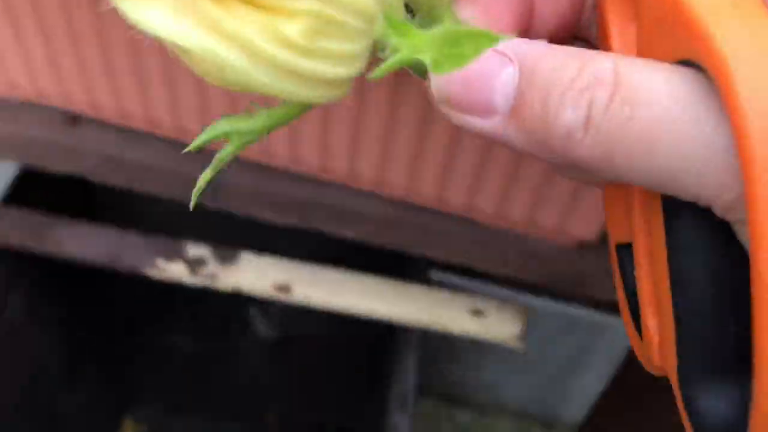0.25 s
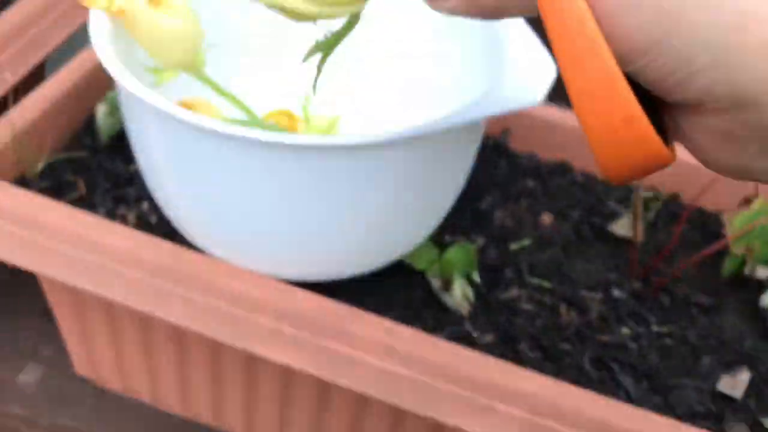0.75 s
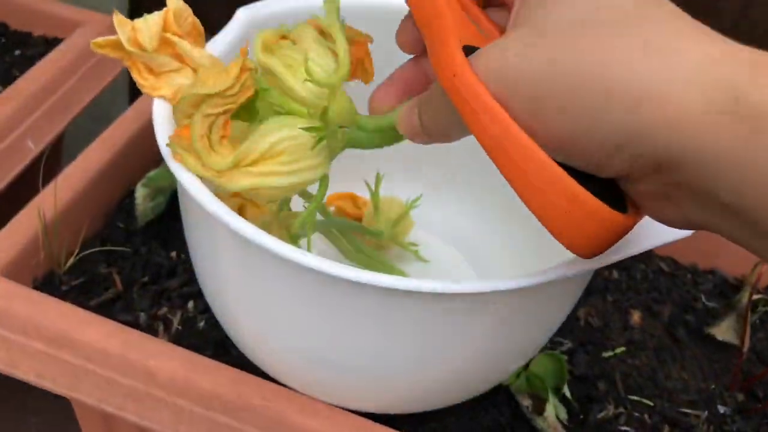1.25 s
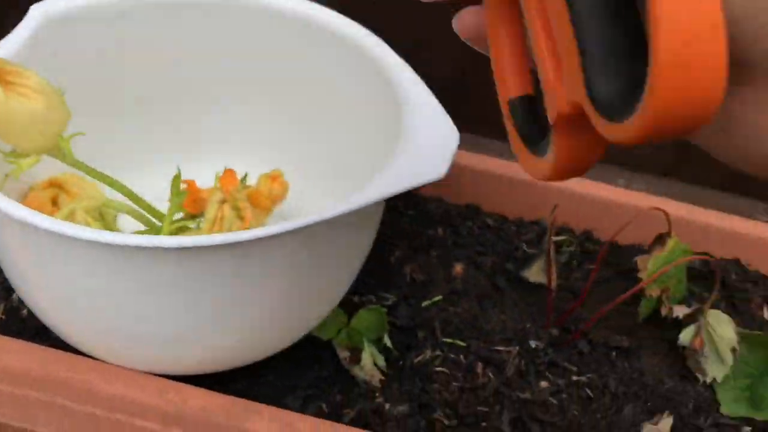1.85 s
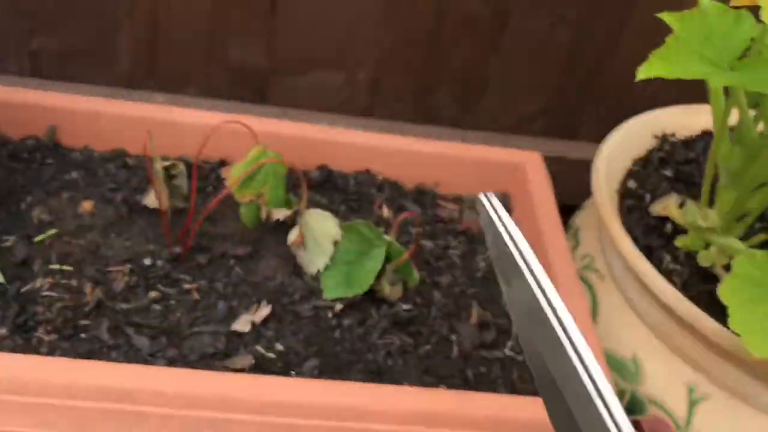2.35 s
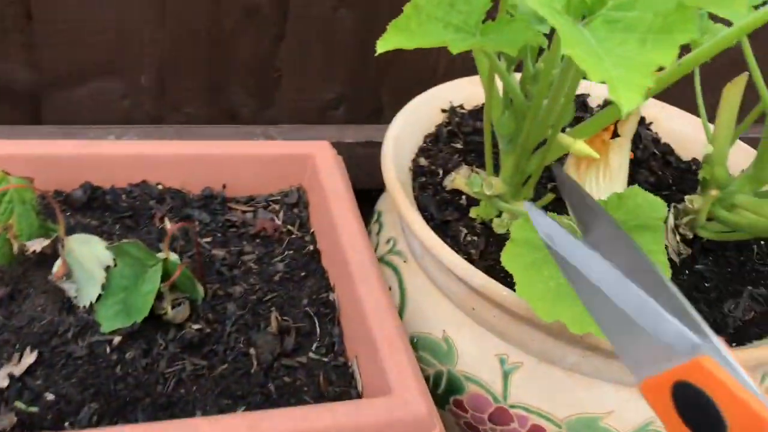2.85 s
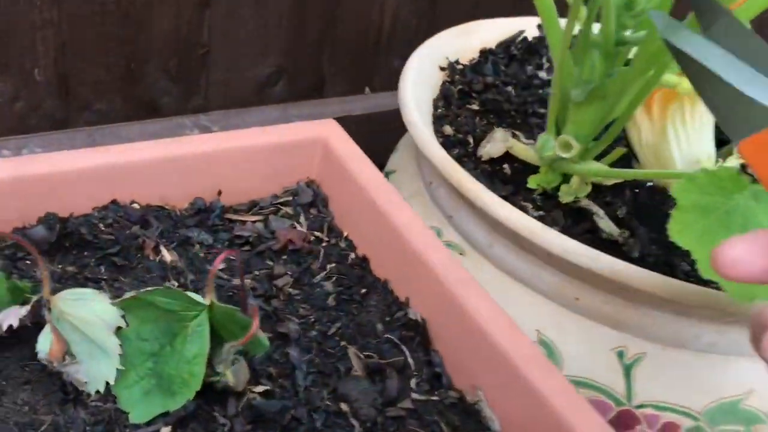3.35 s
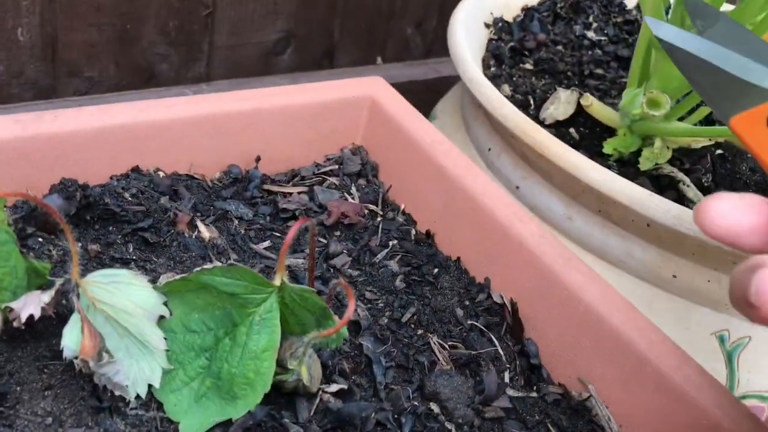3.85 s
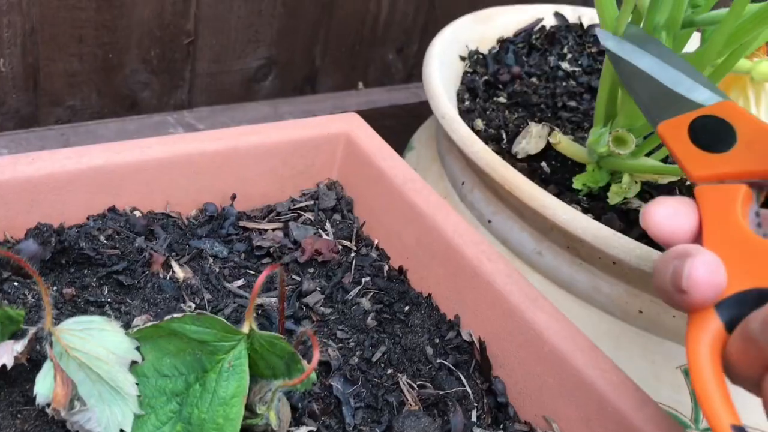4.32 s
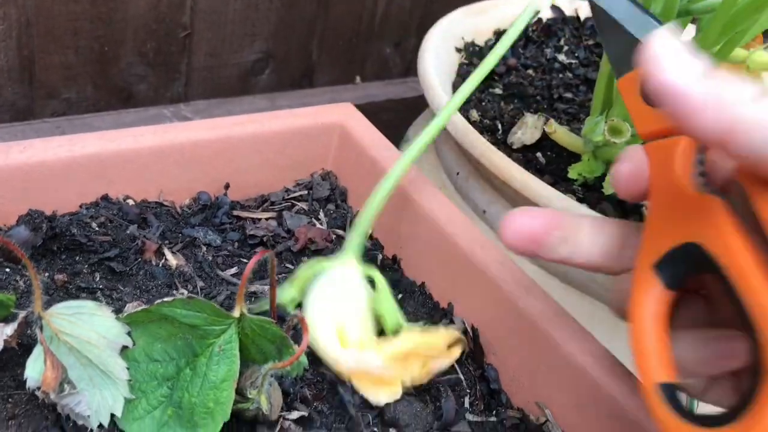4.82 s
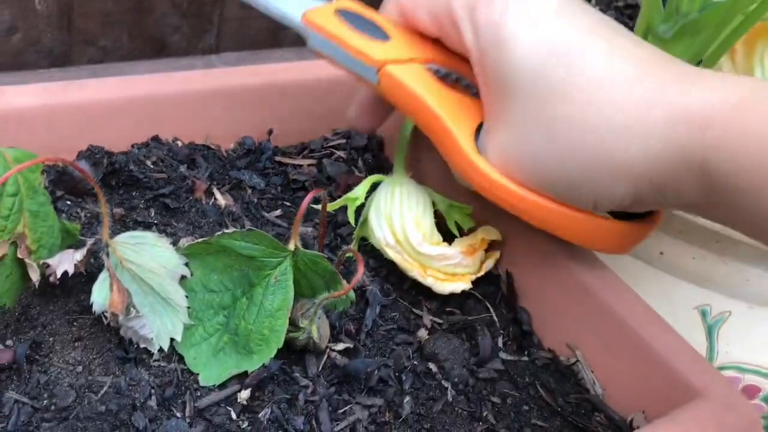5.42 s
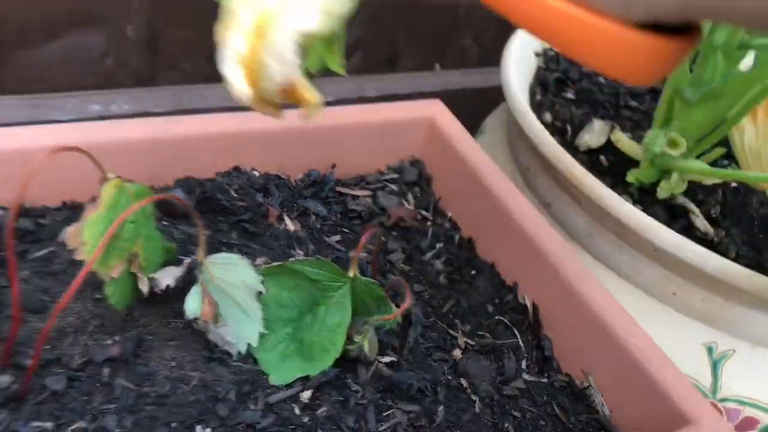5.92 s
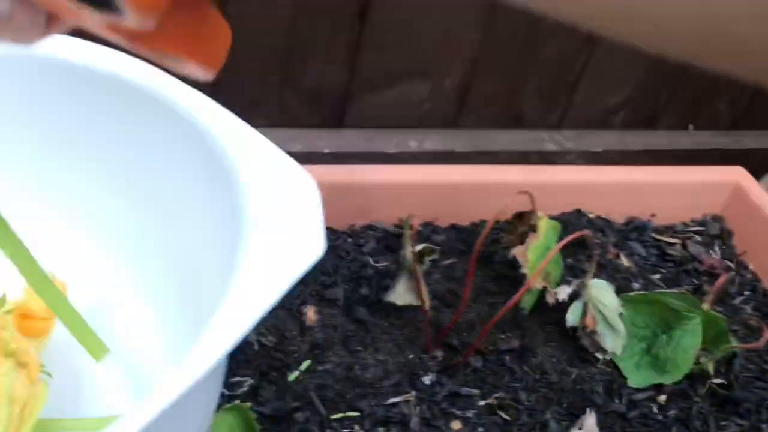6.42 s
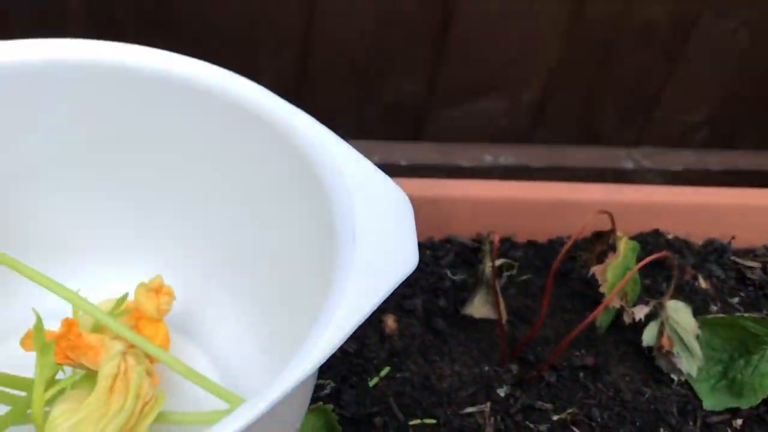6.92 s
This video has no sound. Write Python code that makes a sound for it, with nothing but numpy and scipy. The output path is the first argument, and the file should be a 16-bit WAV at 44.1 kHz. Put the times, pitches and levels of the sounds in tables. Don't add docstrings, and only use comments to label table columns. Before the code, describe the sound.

A quiet outdoor spot with soft engines droning beyond a fence. Early on, stalks bump a plastic bowl, giving a dull low knock and a flurry of ticks. Blades slide with thin metallic whispers, a pause, then fibres crunch and the scissors clack shut, by far the loudest event, with a short ring. Afterwards come leaf rustles, a small pot tap and a final gentle bowl knock, heard close on a phone.

```python
import sys
import numpy as np
from scipy import signal
from scipy.fft import rfft, irfft
from scipy.io import wavfile
from scipy.ndimage import uniform_filter1d

SR = 44100
rng = np.random.default_rng(int(sys.argv[2]) if len(sys.argv) > 2 else 0)


def waveform_to_disk(signal):
    frames = np.transpose(np.atleast_2d(signal))
    scaled = np.clip(frames, -1, 1) * 32767
    samples = np.round(scaled).astype(np.int16)
    wavfile.write(sys.argv[1], SR, samples)


def gain_from_db(level_db):
    decades = np.asarray(level_db, float) / 20
    return 10 ** decades


N = 316281
LN_1000 = np.log(1000)

# pitch_hz, density_db
AIR = [(15, -35.5), (25, -9.5), (55, 3), (130, -4.5), (206, -7.5), (405, -17.5), (695, -36), (962, -23),
       (2550, -35), (4030, -34.5), (4740, -40), (8140, -39), (10400, -42.5), (14800, -42), (16000, -49)]
# time_s, pitch_hz, level_db
FAR_TONES = [
    [(4.16, 397, -70), (4.36, 402, -73), (4.45, 408, -80), (4.63, 421, -68), (4.72, 425, -71),
     (4.8, 434, -67), (4.94, 435, -71), (5.0, 443, -65), (5.12, 452, -78)],
    [(5.15, 570, -82), (5.3, 577, -79), (5.4, 582, -81), (5.46, 586, -86), (5.57, 605, -81)],
    [(5.43, 2500, -81), (5.47, 2660, -82), (5.51, 2720, -82), (5.55, 2760, -90), (5.63, 2780, -80),
     (5.68, 2760, -88), (5.75, 2700, -92), (5.79, 2650, -82), (5.81, 2640, -88)],
]
# peak_s, level_db, rise_s, fall_s
SURGES = [(0.1, -39, .6, 0.6), (0.52, -43.5, 0.66, 0.15), (1.0, -51.5, 0.43, 0.29), (1.38, -43, 0.13, 0.34),
          (1.9, -50.5, 0.31, 0.47), (2.55, -49, 0.36, 0.28), (3.0, -44.5, 0.304, 0.194),
          (3.39, -45.5, 0.36, 0.37), (3.77, -49, 0.28, .3), (4.25, -54.5, 0.3, 0.51),
          (4.68, -56, 0.14, 0.49), (6.03, -57, 0.332, 0.1), (6.8, -54.5, 0.56, 0.2)]
# peak_s, level_db, rise_s, fall_s
DRONES = [(0.62, -48.5, 0.23, 0.197), (1.1, -51, 0.33, 0.56), (1.75, -54, 0.64, 0.563),
          (2.4, -54.5, 0.295, 0.426), (2.85, -53, 0.137, 0.15), (3.55, -51, 0.7, 0.748),
          (4.3, -55, 0.23, 0.34), (4.8, -49, 0.49, 0.54), (5.4, -43.5, 0.58, 0.562), (5.95, -48, 0.424, 1),
          (6.35, -41.5, 0.103, 0.768), (7.09, -43, 0.474, 0.272)]
# nearest_s, level_db, and coming_s, going_s to cover one kerb distance
CARS = [
    (1.4, -67.5, 0.3, .2),
    (2.65, -52, 0.85, 0.49),
    (5.3, -63.5, 0.87, 0.56),
]
# multiple, level_db
CLOCK = [(1, -90), (4, -88), (6, -89), (8, -92), (13, -96), (15, -98)]
# low_hz, high_hz
SHARES = [(1000, 3000), (2600, 10000), (8200, 15500)]

# start_s, blow_db, contact_ms
KNOCKS = [(1.1105, -34, 0.41), (1.1118, -22.5, 0.98), (1.1135, -26.5, 1.5), (1.132, -31, 0.95),
          (1.146, -35, 1.12), (1.158, -36.5, 0.77), (1.178, -32.5, .9), (1.1825, -34, 1.03),
          (1.19, -40.5, 1.1), (1.321, -44, 0.85), (1.352, -43, 1.1), (1.358, -43, 0.9), (1.387, -45, 1.1),
          (1.405, -38.5, 0.73), (1.413, -43, 0.86), (1.426, -47, 0.53), (1.44, -52, 0.69),
          (1.497, -44, 0.51), (6.705, -50, 0.54)]
# pitch_hz, level_db, t60_s
BOWL_MODES = [(524.4, -16, 0.098), (549, -9, 0.1), (568, -9, 0.098), (610, -25, 0.044), (698, -33, 0.031)]
# start_s, blow_db; pitch_hz, level_db, t60_s
BUMPS = [
    ([(1.1102, -38.5)], [(1710, 0.5, 0.0143), (2100, -2.5, 0.0313), (2520, 0, 0.0184), (3140, 2, 0.015), (5330, -16, 0.016)]),
    ([(4.9113, -37.5), (4.9165, -56)], [(1213, -4, 0.014), (1620, -2, 0.015), (1982, 3.5, 0.016), (2603, -9.5, 0.06), (2940, -11, 0.055)]),
    ([(2.8045, -56), (2.8123, -52), (4.8305, -49.5), (4.834, -64), (4.845, -64.5), (4.912, -49)], [(610, 4, 0.022), (890, 8, 0.012), (1290, 7.5, 0.0107), (1980, -17.5, 0.0145)]),
    ([(6.5685, -28.5)], [(584, -2, 0.032), (671.5, -7, 0.055), (990, -1.5, 0.0244), (1320, -2, 0.015), (1943, -21, 0.024), (2880, -37.5, 0.023)]),
]
# peak_s, level_db, rise_s, fall_s
DRAGS = [
    (1.145, -52, .02, 0.031),
    (1.17, -57.5, 0.029, 0.0136),
    (1.345, -57.5, 0.036, 0.05),
    (1.41, -54, 0.05, 0.03),
]

# peak_s, level_db, rise_s, fall_s, dullness_db
PETALS = [(1.125, -72, 0.0102, 0.029, 11.5), (1.18, -74.5, 0.026, 0.0196, 11),
          (1.335, -62.5, 0.046, 0.035, 2.5), (1.378, -63.5, 0.0145, 0.0193, 13.5),
          (1.41, -63, 0.043, 0.085, 1.5), (1.497, -49.5, 0.011, 0.011, -9),
          (1.53, -64.5, 0.02246, 0.048, 2), (6.553, -58, 0.0165, 0.057, -0.5),
          (6.605, -62, 0.066, 0.024, 1), (6.672, -58.5, 0.017, 0.051, -4.5), (6.692, -76, .01, .014, 6.5),
          (6.725, -60.5, 0.0364, 0.028, -1), (6.77, -73.5, .02, 0.027, -4)]
# peak_s, level_db, rise_s, fall_s, dullness_db
SLIDES = [(2.545, -57, 0.0178, 0.037, -11), (2.606, -50.5, 0.0225, 0.029, -2), (2.808, -62, .004, .006, 0),
          (2.816, -57.5, 0.006, 0.025, -3), (2.84, -64, 0.024, 0.04, 2), (2.87, -68, .03, 0.067, 5.5),
          (2.575, -59, .025, .025, 0), (2.635, -61, .015, .035, 2), (3.365, -60, .012, .015, 2),
          (2.99, -60, 0.027, 0.047, 0.5), (3.055, -63.5, 0.038, 0.06, -18.5),
          (3.348, -60, 0.018, 0.025, -5), (3.385, -60, 0.02, .025, 0), (4.235, -62, .02, 0.056, 0),
          (4.306, -54, .008, 0.02, -14), (4.333, -59.5, .02, 0.0087, -10.5), (4.36, -53, .012, 0.013, -7)]
# peak_s, level_db, rise_s, fall_s, dullness_db
LEAVES = [(2.16, -72, 0.072, 0.058, -4.5), (2.24, -68, 0.063, 0.092, -6), (3.995, -64, 0.006, 0.0196, -4.5),
          (4.6, -60.5, 0.034, 0.0303, -6), (4.655, -60, 0.057, 0.058, -10), (4.74, -58, 0.061, 0.07, -2.5),
          (4.833, -50, 0.0069, 0.0174, 6.5), (4.862, -58.5, 0.0203, 0.034, -6),
          (4.914, -62, .004, 0.0196, 13.5), (4.965, -64.5, 0.0368, 0.053, -4),
          (5.54, -68, .035, 0.031, 2.5), (5.575, -60.5, 0.0342, 0.0133, -1),
          (5.667, -68.5, 0.026, 0.097, 3), (5.89, -68, 0.071, 0.012, -12.5),
          (5.96, -71, 0.0696, 0.039, 0.5), (6.15, -69, 0.066, 0.13, -2), (6.346, -71.5, 0.053, 0.03, -5.5)]
# peak_s, level_db, rise_s, fall_s, dullness_db
SHAVES = [
    (2.819, -59, .006, .014, -1),
    (3.351, -68, .012, .014, -10),
]

# start_s, level_db, dullness_db
THUDS = [(0.5321, -71, 9), (4.8286, -45, -6), (5.5739, -62.5, 2), (6.5686, -68, 19.5), (6.6, -75.5, 4.5),
         (6.6357, -64, 5.5)]
# start_s, level_db, dullness_db
CLICKS = [(0.9518, -61.5, -12.5), (1.376, -57.5, -2), (1.4849, -59.5, 0.5), (1.494, -58, -4),
          (2.645, -61, -10), (3.9907, -57, -2), (4.2157, -59, -14), (4.2285, -52, -16.5),
          (4.3683, -53, -8.5), (4.6616, -56.5, -18), (4.7366, -55, -7), (4.9347, -59.5, -12.5),
          (5.078, -65, -6), (6.6998, -51, -15.5)]
# start_s, level_db, dullness_db
FLICKS = [(0.5795, -69, 6), (1.4357, -60, 3.5), (2.986, -60, 0), (3.0453, -60, 3), (3.3128, -57, -10),
          (4.2608, -60, -6), (4.3261, -61, -7), (4.5019, -60, 4.5), (4.5197, -64.5, -8), (4.9521, -62, 7.5),
          (6.6867, -58, 1), (6.6929, -60.5, 4.5), (6.985, -71, -9.5)]
# start_s, level_db, dullness_db
FIBRES = [(1.3678, -71, -1.5), (1.4013, -62.5, 9), (1.599, -76, 14.5), (2.8127, -61.5, 11), (3.143, -76, 6),
          (3.3186, -59.5, 2), (3.334, -56, 4.5), (3.3843, -69, -4.5), (5.1266, -75.5, 2.5),
          (6.144, -75, 11.5), (6.347, -76, 3.5)]
# start_s, peak_db, pitch_hz, t60_s
TAPS = [(1.3327, -47, 1392, 0.024), (1.3635, -42.5, 1446, 0.0216), (1.3681, -45, 1370, 0.039),
        (1.376, -47, 2660, .02), (1.38, -55, 3260, 0.014), (1.385, -48, 2100, 0.031),
        (1.392, -45.5, 1405, 0.022), (1.402, -49.5, 1400, 0.019), (1.403, -50.5, 2250, 0.0196),
        (1.428, -51.5, 2250, .012), (1.439, -49, 2320, 0.0116), (1.467, -51.5, 1400, 0.024),
        (1.4843, -47, 2900, 0.0117), (1.4859, -44, 1390, 0.0153), (1.4934, -42, 2880, 0.0215),
        (1.494, -35, 1320, 0.0164), (1.4955, -45, 2100, 0.0093), (1.4994, -39, 1448, 0.0188),
        (1.4998, -42, 2300, 0.011), (1.511, -45.5, 1393, 0.0196), (4.83, -38, 2202, .02),
        (4.8345, -46.5, 1893, 0.014), (4.842, -50.5, 2100, 0.0174), (4.852, -46, 1990, 0.019),
        (4.857, -48, 2144, 0.0225), (4.868, -52.5, 2100, 0.018), (6.556, -53, 1910, 0.024),
        (6.568, -53, 2360, 0.0128), (6.601, -55, 3460, .018), (6.6347, -52, 1880, 0.0143),
        (6.6886, -45, 1930, 0.017), (6.6881, -47.5, 1386, .02), (6.6938, -46, 1425, .025),
        (6.6992, -45, 2250, 0.0184), (6.711, -54, 1414, 0.04), (6.7473, -53, 1350, .025),
        (1.42, -47, 620, .04), (1.428, -44, 694, 0.033), (2.8068, -50, 3600, .012),
        (2.8126, -42, 1210, .014), (2.815, -49, 3200, .01), (2.827, -48, 2400, .014),
        (2.827, -48, 1000, .014), (5.574, -53, 3100, .015), (5.574, -50, 2700, .015)]
# start_s, peak_db, pitch_hz, t60_s
STEMS = [(4.6375, -49, 3300, .012), (4.646, -51, 5600, .015), (4.651, -51, 4500, .012),
         (4.654, -49, 8900, .01), (4.6605, -48, 4200, .012), (4.661, -52, 6000, .008),
         (4.6725, -51, 9500, .01), (4.672, -52, 4500, .012), (4.7367, -47, 2100, 0.019),
         (4.7367, -49, 4000, 0.015), (4.7367, -48, 8200, .01), (4.756, -52, 8900, .012),
         (4.756, -52, 14000, .008), (2.6447, -52, 7030, .012), (2.6447, -54, 9200, .01),
         (2.6447, -53, 12800, .01), (3.3343, -44, 9000, .006), (3.3345, -50, 3300, .014),
         (3.3186, -48, 9500, .006)]
# start_s, peak_db,
# pitch_hz, t60_s
POPS = [(4.2776, -33, 7200, .006), (4.2797, -27, 4400, .007), (4.2813, -30, 3400, .007),
        (4.2818, -31, 1890, .01), (4.2828, -31, 1120, .011), (4.294, -27, 4300, .009),
        (4.3428, -33, 4300, .009), (4.3468, -33, 3600, .013), (4.3613, -43, 7400, .006),
        (4.3685, -37, 8000, .004), (4.3878, -27, 1120, .012), (4.3926, -16, 2470, .02),
        (4.3922, -20, 1650, .012), (4.3923, -30, 530, .012), (4.3945, -19, 1280, .008),
        (4.3948, -23, 1000, .008), (4.3975, -23, 1500, .012), (4.3951, -15, 2600, .012),
        (5.1266, -46, 14600, .008), (3.3138, -54, 11000, .008), (3.3186, -49, 12200, .012),
        (3.334, -45, 12200, .01), (3.3342, -48, 10900, .012), (5.89, -62, 8300, .02),
        (4.4335, -42, 2900, .01)]

# middle_s,
# level_db, pitch_hz, length_s
SQUEAKS = [(2.531, -66, 6600, .012), (2.541, -56, 6600, .01), (2.553, -60, 5900, .014),
           (2.562, -61, 6400, .014), (2.552, -64, 10200, .02), (2.584, -64, 5800, .012),
           (2.607, -53, 4520, .032), (2.605, -53, 7600, .016), (2.596, -59, 8450, .016),
           (2.617, -61, 8000, .014), (2.612, -59, 12100, .022), (2.606, -62, 14200, .02),
           (3.322, -58, 12200, .008), (3.351, -58, 11200, .018), (4.25, -62, 4300, .016),
           (4.359, -55, 7200, .01), (5.875, -74, 6900, .04), (1.525, -63, 14900, .02),
           (1.525, -64, 12800, .024), (1.537, -65, 13800, .012)]
# start_s, level_db, dullness_db, length_s
BITES = [(4.2778, -41, -21, 0.0012), (4.2799, -31, -14.5, 0.0045), (4.2924, -38, -11, 0.002),
         (4.2938, -30, -11, 0.0028), (4.3389, -51.5, -5, 0.007), (4.3425, -33.5, -14, 0.0075),
         (4.3465, -40.5, -7.5, 0.0029), (4.356, -48, -10, .006), (4.379, -33, -12, 0.011),
         (4.387, -26.5, -10, 0.00328), (4.389, -33.5, -6.5, .003)]
# start_s, blow_db
SNAPS = [
    (4.392, -1),
    (4.3931, -13.5),
    (4.3952, -5),
    (4.3975, -17),
]
# pitch_hz, level_db, t60_s
BLADE_MODES = [(990, -21.5, 0.018), (1565, -13.5, 0.018), (2150, -12.5, 0.016), (2425, -2.5, 0.03),
               (3115, -1, 0.037), (3294, -6, 0.048), (3900, -0.5, 0.024), (4250, -5, .04),
               (4730, -10.5, 0.044), (5090, -1.5, 0.03), (5310, -7, .03), (5800, -6.5, .035),
               (6345, 1.5, 0.04), (6530, -12, 0.045), (8000, -4.5, .03), (7730, -2, .025),
               (8240, -3.5, 0.026), (9000, -6.5, .025), (10556, -19, 0.018), (12940, -9, .02),
               (15580, -25.5, .015)]


def band(x, lo_hz, hi_hz, order=2):
    return signal.sosfilt(signal.butter(order, [lo_hz, hi_hz], "bandpass", fs=SR, output="sos"), x)


def unit(x):
    return x / np.sqrt(np.mean(x ** 2))


def walk(rate_hz):
    k = int(SR / rate_hz)
    held = np.repeat(rng.standard_normal(N // k + 1), k)
    return 1.654 * uniform_filter1d(uniform_filter1d(held, k), k)[:N]


def swells(rows, bend=2.1):
    edge_db = 12
    power = np.zeros(N)
    for s, db, rise, fall in rows:
        first = max(int((s - 3 * rise) * SR), 0)
        last = min(int((s + 3 * fall) * SR), N)
        k = np.arange(first, last)
        late = k / SR - s
        away = np.where(late < 0, -late / rise, late / fall)
        power[k] += gain_from_db(db - edge_db * away ** bend) ** 2
    return np.sqrt(power)


def blows(rows, contact_ms=0.023):
    push = np.zeros(N)
    for s, db, *own_ms in rows:
        width = max((own_ms or [contact_ms])[0], 0.03) * SR / 1000
        k = np.arange(int(width) + 2) + int(s * SR)
        half_sine = np.sin(np.pi * np.clip((k - s * SR) / width, 0, 1))
        push[k] += gain_from_db(db) * half_sine * np.pi / 2 / width
    return push


def ring(push, modes):
    out = np.zeros(N)
    busy = np.flatnonzero(push)
    span = slice(busy[0], busy[-1] + SR // 2)
    for hz, db, t60 in modes:
        pole = np.exp(2j * np.pi * hz / SR - LN_1000 / (t60 * SR))
        side = rng.choice([-1, 1]) if hz > 800 else 1
        out[span] += gain_from_db(db) * side * signal.lfilter([1], [1, -pole], push[span]).imag
    return out


def grit(shape, grain_db):
    grain = 20
    sizes = gain_from_db(grain_db * rng.standard_normal(shape[:-1] + (shape[-1] // grain + 1,)))
    sizes = np.repeat(sizes, grain, axis=-1)[..., :shape[-1]]
    crackle = rng.standard_normal(shape) * sizes
    return [band(crackle, lo, hi) for lo, hi in SHARES]


def bursts(rows, shape, grain_db):
    t = np.arange(4096) / SR
    settle = 512
    first = int(0.003 * SR)
    shares = grit((len(rows), len(t) + settle), grain_db)
    out = np.zeros(N)
    for (s, db, low_db, high_db, length), *share in zip(rows, *shares):
        shaped = [v[settle:] * shape(t, length) for v in share]
        low, middle, high = (v / np.std(v[:first]) for v in shaped)
        k = int(s * SR)
        out[k:k + len(t)] += gain_from_db(db + 1.0) * (gain_from_db(low_db) * low + middle + gain_from_db(high_db) * high)
    return out


def clock():
    clock_hz = 996.95
    k = np.arange(1, 16)
    start = rng.random((len(k), 1))
    phase = 2 * np.pi * (clock_hz * k[:, None] * np.arange(N) / SR + start)
    return np.sqrt(2) * gain_from_db(np.interp(k, *np.transpose(CLOCK))) @ np.sin(phase)


def open_air():
    hz = np.maximum(np.fft.rfftfreq(N, 1 / SR), 1)
    air_hz, air_db = np.transpose(AIR)
    colour = gain_from_db(np.interp(np.log(hz), np.log(air_hz), air_db, left=-60))
    hiss = unit(irfft(rfft(rng.standard_normal(N)) * colour, N))
    return hiss * gain_from_db(-53 + 0.65 * walk(6.9))


def engine_hum():
    firing_hz = 49.1 * (1 + 0.02 * walk(2.5))
    tone = np.sin(2 * np.pi * np.cumsum(firing_hz) / SR)
    rumble = unit(band(rng.standard_normal(N), 42, 60))
    return swells(SURGES, bend=1.8) * (tone + 0.3 * rumble)


def engine_drone():
    lower = unit(band(rng.standard_normal(N), 172.16, 209.5))
    upper = unit(band(rng.standard_normal(N), 215.8, 260.75))
    return swells(DRONES, bend=1.7) * unit(lower + 0.54 * upper) * gain_from_db(0.5 * walk(13))


def passing():
    t = np.arange(N) / SR
    power = np.zeros(N)
    for s, db, coming, going in CARS:
        along = (t - s) / np.where(t < s, coming, going)
        power += gain_from_db(db) ** 2 / (1 + along ** 2)
    return np.sqrt(power)


def tyre_roar():
    noise = rng.standard_normal(N)
    roar = unit(band(band(noise, 270, 2000), 480, 1250, order=1)) * gain_from_db(0.8 * walk(10))
    body = gain_from_db(-6.0) * unit(band(noise, 250, 350))
    hiss = gain_from_db(-19.0) * unit(band(noise, 2600, 5500))
    return gain_from_db(-3.5) * passing() * (roar + body + hiss)


def far_tones():
    t = np.arange(N) / SR
    out = np.zeros(N)
    for table in FAR_TONES:
        s, pitch_hz, level_db = np.transpose(table)
        gate = np.interp(t, [s[0] - 0.01, s[0], s[-1], s[-1] + 0.008], [0, 1, 1, 0])
        hz = np.interp(t, s, pitch_hz)
        db = np.interp(t, s, level_db)
        phase = 2 * np.pi * np.cumsum(hz * (1 + 0.004 * walk(30))) / SR
        out += gate * gain_from_db(db + 5.5 + 2.9 * walk(18)) * np.sin(phase)
    return out


def bowl():
    rub = swells(DRAGS, bend=2.8) * rng.standard_normal(N) * gain_from_db(-16.5 + 2.38 * walk(49.76))
    out = ring(blows(KNOCKS) + rub, BOWL_MODES)
    for rows, modes in BUMPS:
        out += ring(blows(rows, contact_ms=0.11), modes)
    return out


def rustles():
    low, middle, high = map(unit, grit((N,), grain_db=3.0))
    out = np.zeros(N)
    for rows, high_db in (PETALS, -6), (SLIDES, -6.5), (LEAVES, -5.5), (SHAVES, 7):
        dull = [(s, db + dull_db, rise, fall) for s, db, rise, fall, dull_db in rows]
        bright = swells([row[:-1] for row in rows])
        out += swells(dull) * low + bright * (middle + gain_from_db(high_db) * high)
    return out * gain_from_db(1.2 * walk(150))


def tick_shape(t, t60):
    return (1 - np.exp(-t / 0.00039)) * np.exp(-LN_1000 * t / max(t60, 0.003))


def ticks():
    rows = []
    for table, high_db, t60 in ((THUDS, -8.5, 0.026), (CLICKS, -6, 0.022),
                                (FLICKS, 1.5, 0.023), (FIBRES, 12, 0.013)):
        rows += [(s, db, dull_db, high_db, t60) for s, db, dull_db in table]
    return bursts(rows, tick_shape, grain_db=-0.5)


def pings():
    t = np.arange(4096) / SR
    out = np.zeros(N)
    for table in (TAPS, POPS, STEMS):
        for s, db, hz, t60 in table:
            build = 1 - np.exp(-t * hz / 0.95)
            fade = np.exp(-LN_1000 * t / t60)
            out[int(s * SR):][:len(t)] += gain_from_db(db + 1.5) * build * fade * np.sin(2 * np.pi * hz * t)
    return out


def squeaks():
    width = 0.03
    out = np.zeros(N)
    for s, db, hz, length in SQUEAKS:
        k = np.arange(int((s - 0.1) * SR), int((s + 0.12) * SR))
        tone = unit(band(rng.standard_normal(len(k)), hz * (1 - width), hz * (1 + width)))
        out[k] += gain_from_db(db) * tone * np.exp(-(2 * (k / SR - s) / length) ** 2)
    return out


def bite_shape(t, length):
    tear = 1.7 * np.exp(-(t / length) ** 2)
    tail = 0.24 * np.exp(-LN_1000 * t / 0.071)
    return (1 - np.exp(-t / 0.000068)) * (tear + tail)


def bites():
    rows = [(s, db, dull_db, -9, length) for s, db, dull_db, length in BITES]
    return bursts(rows, bite_shape, grain_db=2.0)


def scatter():
    t = np.arange(int(0.4 * SR)) / SR
    noise = rng.standard_normal((4, len(t)))
    chatter = gain_from_db(-7.0) * band(noise[0], 2700, 8500) * np.exp(-LN_1000 * t / 0.036)
    near = band(noise[1], 2200, 5400) + 0.8 * band(noise[1], 5400, 8500)
    near += 0.7 * band(noise[1], 3700, 4900, order=1) + 0.7 * band(noise[1], 7900, 8900, order=1)
    near *= gain_from_db(-17) * np.exp(-LN_1000 * t / 0.12) * (1 - np.exp(-t / 0.0032))
    far = gain_from_db(-35.0) * band(noise[2], 1300, 9000) * np.exp(-LN_1000 * t / 0.3)
    far *= 1 - np.exp(-t / 0.0093)
    sheen = gain_from_db(-39.0) * band(noise[3], 9500, 15800) * np.exp(-LN_1000 * t / 0.12)
    return chatter + near + far + sheen


def snap():
    push = blows(SNAPS)
    steel = gain_from_db(-16.5) * band(ring(push, BLADE_MODES), 820, 19000, order=3)
    crack = gain_from_db(18.0) * band(blows(SNAPS[:1]), 6900, 8900)
    return steel + signal.fftconvolve(push, scatter())[:N] + crack


def scene():
    street = open_air() + engine_hum() + engine_drone() + tyre_roar() + far_tones()
    flowers = bowl() + rustles() + ticks() + pings()
    scissors = squeaks() + bites() + snap()
    return (street + flowers + scissors)[None]


def top_cut(x):
    return signal.sosfilt(signal.butter(12, 16640, fs=SR, output="sos"), x)


def record(dry):
    b, a = signal.iirpeak(10500, 14, fs=SR)
    heard = dry - 0.44 * signal.lfilter(b, a, dry)
    heard = signal.sosfilt(signal.butter(2, 33, "highpass", fs=SR, output="sos"), heard)
    heard = signal.sosfilt(signal.butter(8, 15900, fs=SR, output="sos"), heard)
    over = np.maximum(np.abs(heard) - 0.15, 0)
    release = np.exp(-1 / (0.12 * SR))
    load = signal.lfilter([1 - release], [1, -release], over)
    mix = np.clip(heard / (1 + 110 * load) + clock(), -1, 1)
    return top_cut(mix)


dry = scene()
out = record(dry)
waveform_to_disk(out)
```